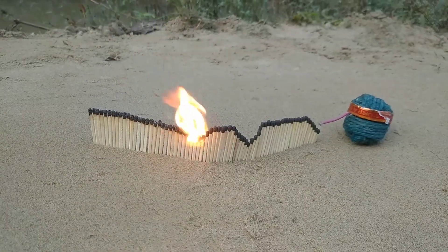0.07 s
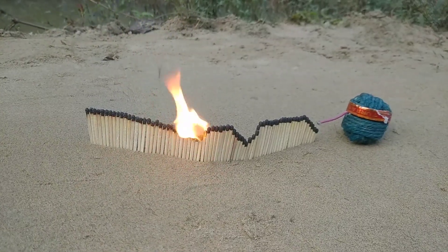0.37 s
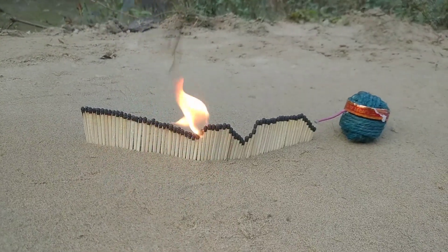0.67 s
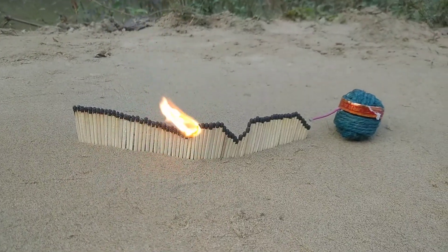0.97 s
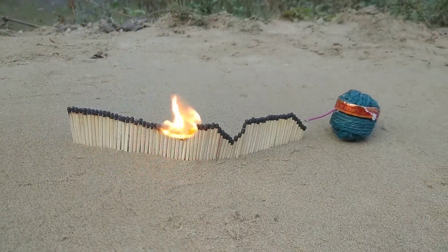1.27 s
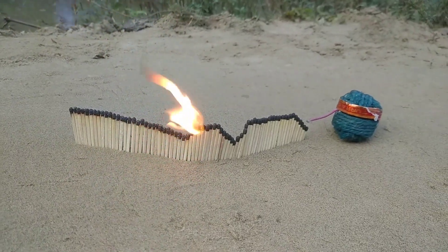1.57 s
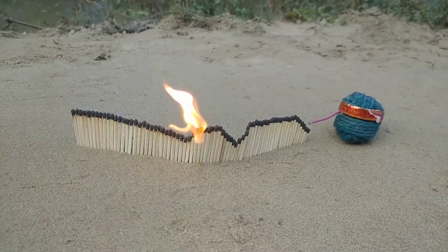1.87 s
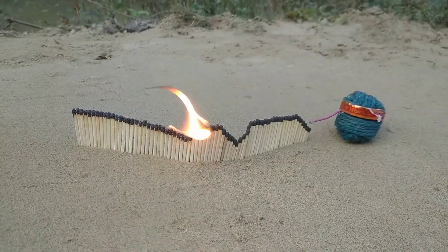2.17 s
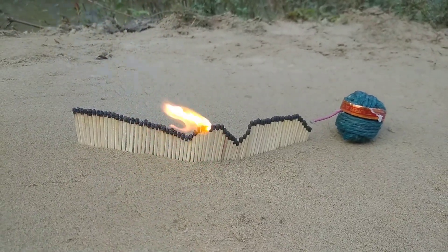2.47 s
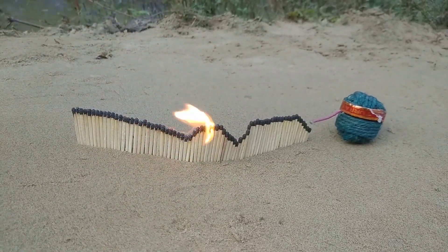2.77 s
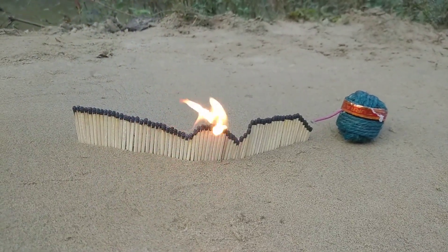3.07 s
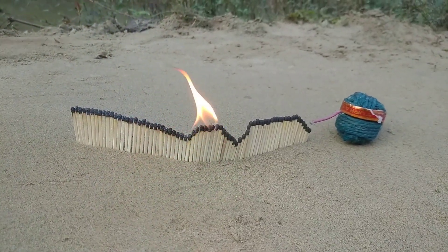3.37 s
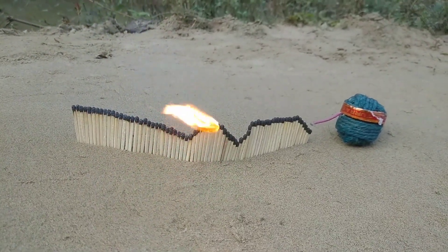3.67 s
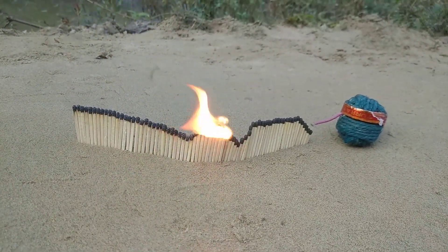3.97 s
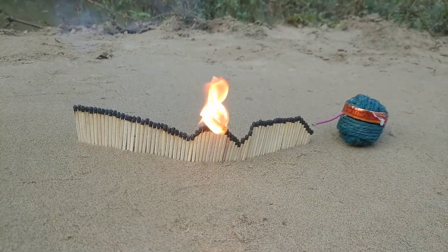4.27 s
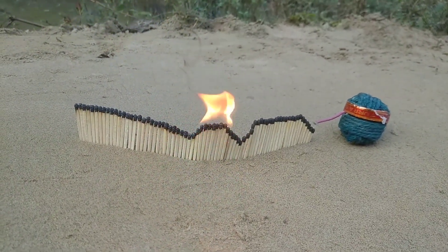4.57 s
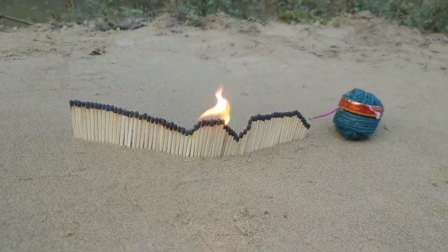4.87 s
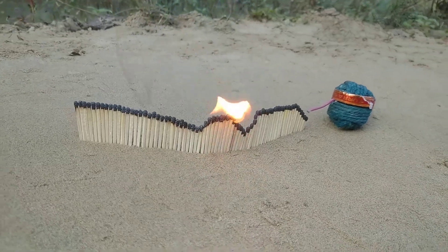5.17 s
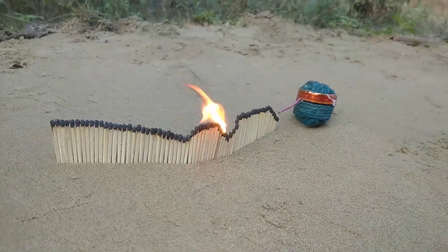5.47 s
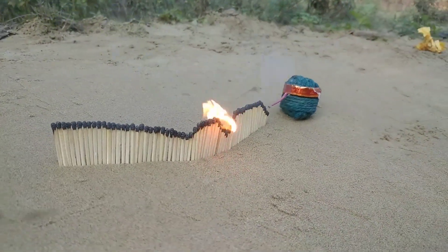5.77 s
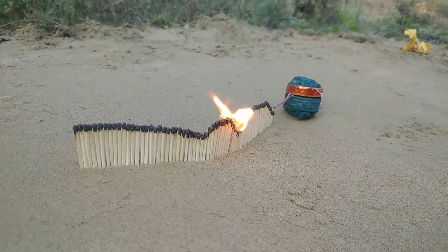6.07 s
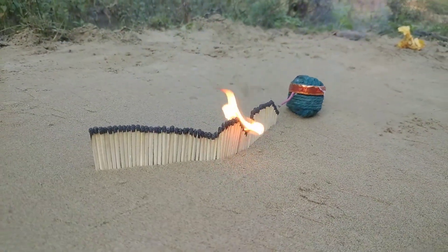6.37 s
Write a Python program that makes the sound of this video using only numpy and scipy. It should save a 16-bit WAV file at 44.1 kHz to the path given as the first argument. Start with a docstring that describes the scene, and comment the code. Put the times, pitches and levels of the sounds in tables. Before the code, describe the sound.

Match heads hiss and fizz quietly one after another outdoors, the small flame fluttering, briefly sputtering and catching again.

```python
"""Matches burning on sand

A row of matches burns head by head on open sand, close to a microphone's two openings (ports).
Each head sizzles with tiny bursts of gas over the soft rush of its flame. Now and then the fire
stalls, sputters with jets and cracks, and catches again. The sand throws back a very short echo
that shifts as the microphone moves round. The outdoor air rumbles faintly."""
import sys
import numpy as np
from scipy import signal
from scipy.fft import rfft, irfft, next_fast_len
from scipy.io import wavfile

SR = 44100
rng = np.random.default_rng(int(sys.argv[2]) if len(sys.argv) > 2 else 0)


def to_wav(s):
    """Save 16-bit WAV."""
    ch = np.atleast_2d(s).T  # columns
    pcm = np.round(np.clip(ch, -1, 1) * 32767)  # PCM
    wavfile.write(sys.argv[1], SR, pcm.astype(np.int16))


N = 291499
TIME = np.arange(N) / SR
FFT_SIZE = next_fast_len(N, real=True)
FFT_HZ = np.fft.rfftfreq(FFT_SIZE, 1 / SR)

# tone of the outdoor air: (frequency [Hz], gain [dB])
AIR_TONE = [(15, -3.5), (30, 3.5), (45, 1), (68, 2), (100, -5.5), (190, -10.5), (300, -18.5), (600, -69),
            (1500, -64.5), (5000, -39.5), (14000, -25)]
# sound paths as fire and microphone move:
# (time [s], echo delay [ms], left port's delay [ms], left minus right in the high treble [dB])
PATHS = [(0.0, 0.411, 0.132, 0.2), (1.5, 0.413, 0.138, -0.5), (2.8, 0.411, 0.13, 1.0),
         (3.4, 0.411, 0.115, -1.0), (3.8, 0.41, 0.122, 2.5), (4.2, 0.407, 0.117, 3.0),
         (4.7, 0.405, 0.096, 4.5), (5.05, 0.398, 0.093, -1.0), (5.35, 0.351, 0.087, 0.5),
         (5.55, 0.313, 0.111, 5.5), (5.75, 0.298, 0.133, 3.5), (6.1, 0.276, 0.103, 5.0),
         (6.61, 0.268, 0.094, 4.8)]
# how well the sand throws sound back: (frequency [Hz], relative strength [0-1])
SAND_BOUNCE = [(300, 0.03), (1200, 0.3), (2100, 0.72), (3400, 0.3), (4600, 0.35), (7000, 0.7), (9500, 0.64),
               (13000, 0.45)]
# the tone shifts with the angle to the row: (time [s], middle [dB], lower treble [dB], top [dB])
ANGLE_TONE = [(0.0, 9.5, -2.7, 4), (1.2, 4, -4, -3.5), (2.8, 4.5, -2, -3.5), (3.6, 6, -1, -1.5),
              (4.3, 9.5, 2, -1.3), (5.0, 5.3, 6.5, -2), (5.35, 9.5, 5, -6), (5.75, 12.5, -5, -3.5),
              (6.15, 9, -3, -2.5), (6.61, 13, 4, 1.5)]
# where bass, middle, lower treble, sizzle peak and top lie: (frequency [Hz])
BANDS_HZ = [1200, 3200, 6200, 8400, 11500]
# a narrow dip in the tone, where the two ports cancel: (time [s], frequency [Hz])
DIP_PATH = [(0.0, 1930), (4.9, 1970), (5.5, 2180), (5.9, 2250), (6.6, 2480)]
# how alike the fire sounds at the two ports: (frequency [Hz], likeness [0-1])
FIRE_LIKENESS = [(500, 0.97), (1300, 0.92), (2000, 0.9), (2700, 0.985), (4200, 0.99), (5200, 0.8),
                 (6300, 0.93), (8400, 0.88), (10000, 0.85), (13000, 0.2)]
# one or a few heads flare up: (time at full burn [s], hold [s], relative sizzle [dB], relative flame [dB])
HEAD_FLARES = [(0.007, 0.062, -42.5, -56.5), (0.226, 0.016, -43.5, -58), (0.367, 0.089, -49, -57.5),
               (0.53, 0.075, -45.5, -59.5), (0.772, 0.022, -44, -65.5), (0.92, 0.097, -40.5, -61.5),
               (1.04, 0.043, -44, -56.5), (1.19, 0.0076, -41, -59.5), (1.404, 0.14, -39, -56.5),
               (1.63, 0.019, -43, -61), (1.816, 0.03, -43, -61), (1.898, 0.097, -41.5, -60),
               (2.082, 0.072, -44, -59.5), (2.28, 0.04, -45, -70), (2.491, 0.053, -43, -58.5),
               (2.585, 0.14, -41, -59), (2.876, 0.13, -40.5, -60), (3.057, 0.11, -41.5, -57.5),
               (3.288, 0.022, -47, -67), (3.704, 0.027, -41.5, -55), (3.807, 0.015, -40.5, -60),
               (3.908, 0.11, -47.5, -61), (4.11, 0.066, -45.5, -60), (4.289, 0.0094, -41, -57),
               (4.525, 0.059, -48.5, -62.5), (4.918, 0.094, -46, -63), (4.993, 0.092, -45.5, -62),
               (5.21, 0.34, -49.5, -60.5), (5.616, 0.016, -55, -62), (5.69, 0.071, -43, -61.5),
               (5.864, 0.13, -50.5, -58.5), (6.097, 0.13, -46, -59.5), (6.303, 0.26, -53, -59.5)]
# the fire stalls between heads: (time [s], length [s], sizzle change [dB], flame change [dB])
FIRE_STALLS = [(0.803, 0.008, -13, 1), (0.829, 0.028, -4.5, -2.5), (2.362, 0.068, -16, -12),
               (3.414, 0.2, -9.5, -10.5), (3.603, 0.032, -6, 0), (4.689, 0.11, -8.5, -8.5)]
# tone of the embers: (frequency [Hz], gain [dB])
EMBER_TONE = [(100, 3), (700, 3.5), (2000, -4), (4000, 21.5), (6500, 0), (8500, 1), (13000, -2)]
# the flame surges as fresh heads light: (peak time [s], half width [s], boost [dB])
FLAME_SURGES = [(4.825, 0.018, 7), (5.01, 0.021, 2), (5.37, 0.028, 3), (5.46, 0.012, 1),
                (5.575, 0.012, 4.5)]
# tone of the flame: (frequency [Hz], gain [dB])
FLAME_TONE = [(60.0, 10), (150.0, 9.5), (250.0, 6.5), (370.0, 13.5), (520.0, 11), (700.0, 12),
              (1050.0, 9.5), (1500.0, 6.5), (2200.0, 3), (3200.0, -5.5), (5000.0, -2)]
# short jets of gas around the stalls: (time [s], length [s], relative starting level [dB])
GAS_JETS = [(0.824, 0.0071, -42), (2.363, 0.0032, -55), (2.371, 0.004, -47), (2.376, 0.0057, -43),
            (2.417, 0.027, -47), (3.392, .02, -47), (3.448, .003, -54), (3.454, 0.004, -48),
            (3.470, 0.004, -47), (3.481, 0.01, -45.5), (3.495, 0.0018, -46), (3.593, 0.0025, -53),
            (3.597, 0.0058, -45), (3.613, 0.0064, -42), (4.694, 0.016, -48), (4.7524, 0.0088, -47),
            (4.779, 0.0053, -47), (4.79, 0.0078, -60), (4.817, 0.026, -54)]
# tone of the jets: (frequency [Hz], gain [dB])
JET_TONE = [(100, -10), (600, -4.5), (2000, -8.5), (3600, -20.5), (6200, 1.5), (8400, 8), (10200, 4),
            (12000, -1), (14000, -13)]
# the crust of a head cracks: (time [s], relative level [dB])
CRUST_CRACKS = [(0.794, -35), (0.844, -34), (0.932, -34), (0.943, -23), (2.395, -45), (2.408, -31),
                (2.435, -32), (3.382, -39), (3.4535, -32), (3.4705, -34), (3.482, -39), (3.546, -45),
                (3.606, -33), (3.628, -28), (4.7528, -29), (4.78, -37), (4.804, -36), (4.8078, -31),
                (4.8147, -38), (4.819, -35)]
# tone of the cracks: (frequency [Hz], gain [dB])
CRACK_TONE = [(100, -10), (600, -1), (2000, 0.5), (4000, -21), (8400, 14.5), (11000, 1), (14000, -6)]
# tone of the sizzle: (frequency [Hz], left gain [dB], right gain [dB])
SIZZLE_TONE = [(493, -18, -15), (2310, -11, -10.5), (3130, -30.5, -22.5), (3850, -15.5, -16),
               (5180, -10.5, -3.5), (5930, -3.5, -3), (6840, 3, 1.5), (7620, 1.8, 6), (8630, 6, 9),
               (9530, 8.5, 6), (10150, 5.5, -5), (11640, -2.5, -1), (13000, -3.5, -6.5), (13800, -7.5, -14)]


def from_db(db):
    """Turn decibels into a gain to multiply by."""
    return 10 ** (np.asarray(db) / 20)


def unit_power(x):
    """Scale a signal so that its average power is 1."""
    return x / np.sqrt(np.mean(x ** 2) + 1e-20)


def look_up(table, points):
    """Read a table's other columns at the given points along its first."""
    axis, *columns = np.transpose(table)
    return [np.interp(points, axis, column) for column in columns]


def drift(rate_hz):
    """A random wobble of typical size 1, mostly slower than the given rate."""
    spectrum = rfft(rng.standard_normal(FFT_SIZE)) / (1 + (FFT_HZ / rate_hz) ** 2)
    return unit_power(irfft(spectrum, FFT_SIZE)[:N])


def colour(x, tone):
    """Filter a sound by a tone table (one gain column, or one for each side)."""
    size = next_fast_len(N + 2000)
    hz, *columns = np.transpose(tone)
    log_hz = np.log(np.fft.rfftfreq(size, 1 / SR) + 1)
    gain = from_db([np.interp(log_hz, np.log(hz), column) for column in columns])
    return irfft(rfft(x, size) * gain, size)[:, :N]


def stereo_noise(likeness):
    """White noise at two ports: likeness 1 makes them the same, 0 unrelated."""
    shared, opposite = rfft(rng.standard_normal((2, FFT_SIZE)))
    spectrum = np.sqrt(1 + likeness) * shared + np.sqrt(1 - likeness) * opposite * [[1], [-1]]
    return unit_power(irfft(spectrum, FFT_SIZE)[:, :N])


def broad_noise(likeness, apart_hz):
    """Noise from a broad source: short waves reach the two ports less alike."""
    return stereo_noise(likeness / (1 + (FFT_HZ / apart_hz) ** 4))


def fire_noise():
    """Noise of the fire, nearly the same at both ports, wider in the top treble."""
    return stereo_noise(*look_up(FIRE_LIKENESS, FFT_HZ))


def outdoor_air(level_db):
    """The open air rumbles faintly."""
    return from_db(level_db) * unit_power(colour(broad_noise(likeness=0.9, apart_hz=1970), AIR_TONE))


def sand_echo(hz, delay_ms, strength):
    """Left and right gains: the echo adds to some frequencies and cancels others."""
    turn_rad = 2.15  # porous sand shifts the echo's phase
    trip = strength * np.exp(1j * (turn_rad - 2 * np.pi * hz * delay_ms / 1000))
    bounce = trip * look_up(SAND_BOUNCE, hz)[0]
    # repeated bounces between sand and microphone sharpen the notches in the treble
    share, treble_loss = 0.88, 0.16 * (hz > 5500)
    rebounds = (1 + share * trip) / (1 + (share - treble_loss) * trip)
    right_share = 0.098  # the right port faces away from the sand
    return (1 + bounce) * rebounds, (1 + right_share * bounce) * rebounds


def at_ports(x, echo):
    """The moving microphone hears a sound with its echo, and slightly later on the left."""
    hz, times, spectra = signal.stft(x, SR, nperseg=512)
    angle_db = np.transpose([np.interp(hz, BANDS_HZ, [0, middle, treble, 0, top])
                             for middle, treble, top in zip(*look_up(ANGLE_TONE, times))])
    hz = hz[:, None]
    echo_ms, late_ms, side_db = look_up(PATHS, times)
    left, right = sand_echo(hz, echo_ms, echo)
    delay = np.exp(-2j * np.pi * hz * late_ms / 1000)
    # the microphone's body shades one port, for short waves only
    shade = from_db(np.minimum(hz / 8800, 1) ** 2 * side_db / 2)
    ports = spectra * from_db(angle_db) * np.array([left * delay * shade, right / shade])
    # in one narrow band, most of what the ports share cancels
    dip_hz, = look_up(DIP_PATH, times)
    dip = 0.75 * np.exp(-((hz - dip_hz) / 130) ** 2)
    return signal.istft(ports - dip * ports.mean(axis=0), SR)[1][:, :N]


def flares(part, swell_s, fade_s, lead_s=0):
    """Strength of "sizzle" or "flame": each flare swells, holds and fades; their powers add."""
    power = np.zeros(N)
    for start, hold_s, sizzle_db, flame_db in HEAD_FLARES:
        gain = from_db(sizzle_db if part == "sizzle" else flame_db)
        before = np.maximum(start - lead_s - TIME, 0)
        after = np.maximum(TIME - start - hold_s, 0)
        power += (gain * np.exp(-before / swell_s - after / fade_s)) ** 2
    return np.sqrt(power)


def stalls(part, edge_s=0.0067):
    """Gain of "sizzle" or "flame" as the fire sinks to a smoulder and quickly catches again."""
    change_db = np.zeros(N)
    for start, length, sizzle_db, flame_db in FIRE_STALLS:
        inside_s = np.minimum(TIME - start, start + length - TIME)
        stalled = np.clip(1 + inside_s / edge_s, 0, 1)
        change_db += stalled * (sizzle_db if part == "sizzle" else flame_db)
    return from_db(change_db)


def fizz(per_s, spread_db, puff_s, pops_db):
    """A molten head boils: tiny bubbles burst, each with a pop inside a brief puff of gas."""
    noise = fire_noise()
    bursts = rng.random(N) < per_s / SR
    sizes = bursts * from_db(spread_db * np.minimum(rng.exponential(1, N), 4))
    smoothing = np.exp(-1 / (puff_s * SR))
    puff_power = signal.filtfilt([1], [1, -smoothing], sizes ** 2 + 1e-18, padtype="even")
    gas = unit_power(np.sqrt(puff_power) * noise)
    pops = unit_power(sizes * rng.choice([-1, 1], N))
    return unit_power(gas + from_db(pops_db) * pops)


def embers(gain_db):
    """While the fire stalls, the spent heads keep up a faint fizz."""
    stalled = 1 - stalls("sizzle")
    boil = fizz(per_s=700, spread_db=5.5, puff_s=0.0045, pops_db=-18)
    return colour(from_db(gain_db) * stalled * boil, EMBER_TONE)


def flame(flicker, gain_db):
    """Swirling gas rushes softly above the heads; it peaks before the sizzle and dies more slowly."""
    strength = flares("flame", swell_s=0.089, fade_s=0.15, lead_s=0.054) * stalls("flame") * flicker
    surge_db = sum(boost * np.exp(-((TIME - peak) / width) ** 2) for peak, width, boost in FLAME_SURGES)
    rush = strength * fire_noise()
    flutter_db = 0.5 * drift(rate_hz=60)
    return colour(rush * from_db(gain_db + surge_db + flutter_db), FLAME_TONE)


def gas_jets(gain_db, sag_db):
    """Each raspy jet opens at once, weakens as its pocket of gas empties, and shuts."""
    strength = np.zeros(N)
    for start, length, level_db in GAS_JETS:
        emptied = np.linspace(0, 1, int(length * SR))
        at = round(start * SR)
        strength[at:at + len(emptied)] += from_db(gain_db + level_db - sag_db * emptied)
    return colour(strength * broad_noise(likeness=0.36, apart_hz=13000), JET_TONE)


def crust_cracks(gain_db, grit_db, grit_fade_s):
    """A head's crust cracks with a sharp pulse and a very short spray of grit."""
    age = np.arange(200) / SR
    cracks = np.zeros(N)
    for start, level_db in CRUST_CRACKS:
        crack = from_db(grit_db) * rng.standard_normal(len(age)) * np.exp(-age / grit_fade_s)
        crack[0] = 1  # the pulse
        at = round(start * SR)
        cracks[at:at + len(age)] += from_db(gain_db + level_db) * crack
    return colour(cracks, CRACK_TONE)


def match_heads(flicker, gain_db):
    """The heads boil with a bright sizzle as the fire passes from one to the next."""
    strength = flares("sizzle", swell_s=0.086, fade_s=0.1) * stalls("sizzle") * flicker
    boil = fizz(per_s=2000, spread_db=2.0, puff_s=0.003, pops_db=-7.5)
    return colour(from_db(gain_db) * strength * boil, SIZZLE_TONE)


def scene():
    """One flickering flow of gas drives sizzle and flame; jets and cracks break out around the stalls."""
    flicker = from_db(drift(rate_hz=23))
    fire = match_heads(flicker, gain_db=-0.5) + flame(flicker, gain_db=-0.15)
    air = outdoor_air(level_db=-62)
    smoulder = embers(gain_db=-72)
    jets = gas_jets(gain_db=-1.5, sag_db=4)
    cracks = crust_cracks(gain_db=-0.5, grit_db=-10, grit_fade_s=0.0004)
    return air + at_ports(fire + smoulder, echo=0.71) + at_ports(jets + cracks, echo=0.42)


def record(dry):
    """A steep filter cuts the treble above 14150 Hz."""
    return signal.sosfilt(signal.ellip(12, .1, 80, 14150, fs=SR, output="sos"), dry)


dry = scene()
out = record(dry)
to_wav(out)
```